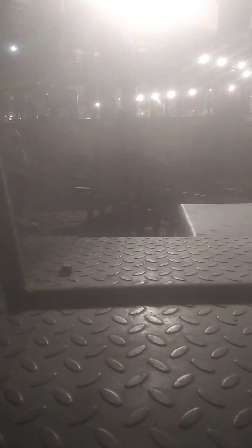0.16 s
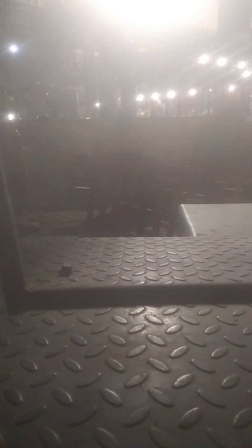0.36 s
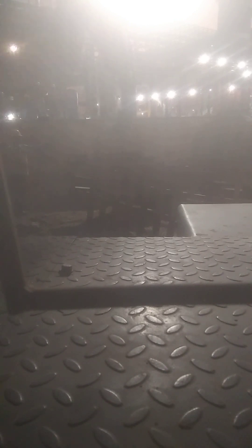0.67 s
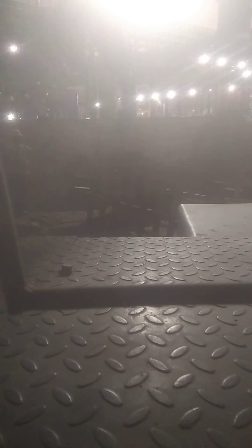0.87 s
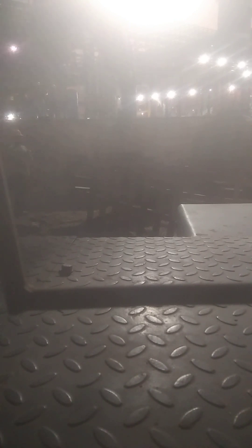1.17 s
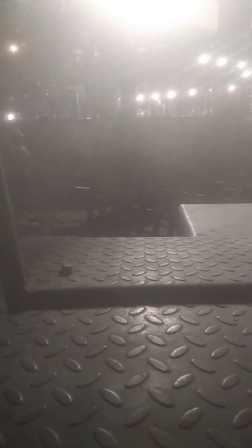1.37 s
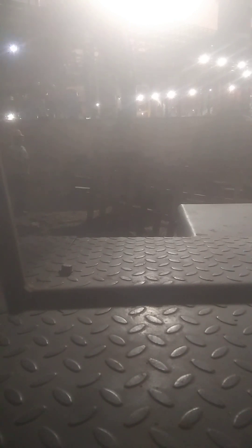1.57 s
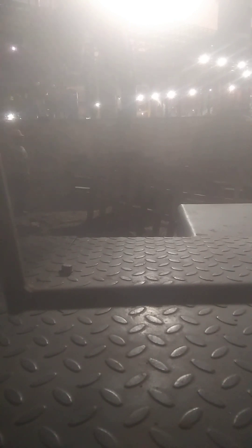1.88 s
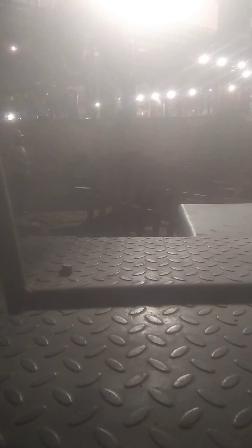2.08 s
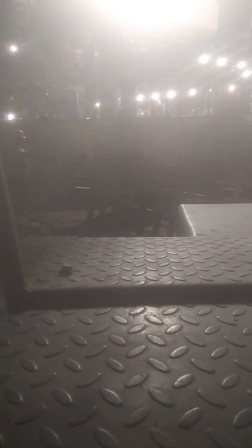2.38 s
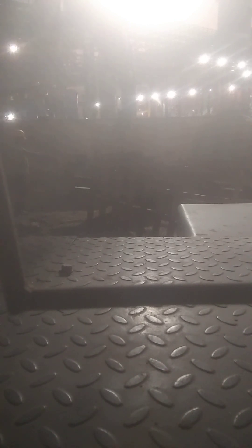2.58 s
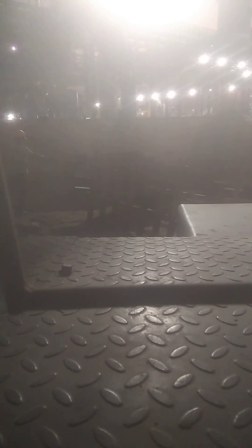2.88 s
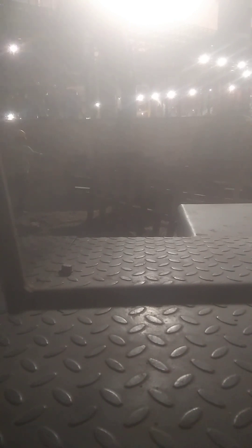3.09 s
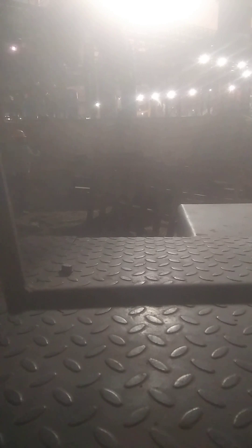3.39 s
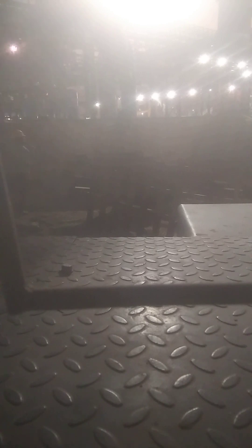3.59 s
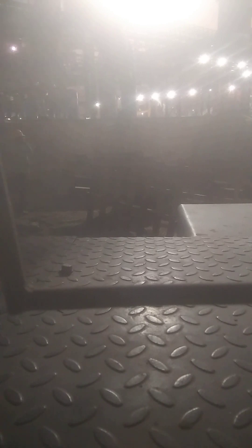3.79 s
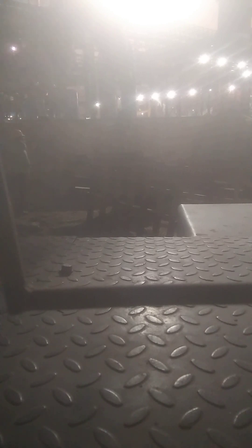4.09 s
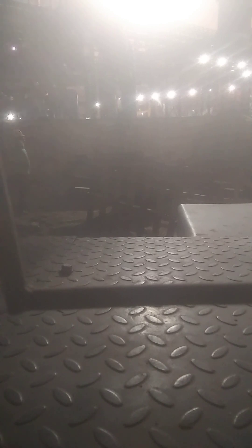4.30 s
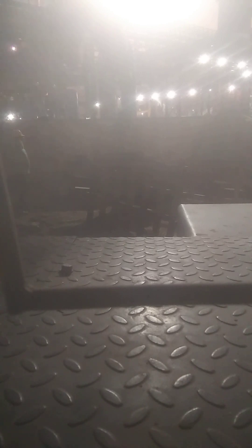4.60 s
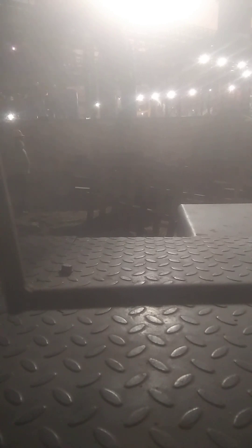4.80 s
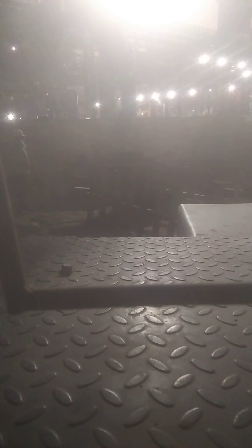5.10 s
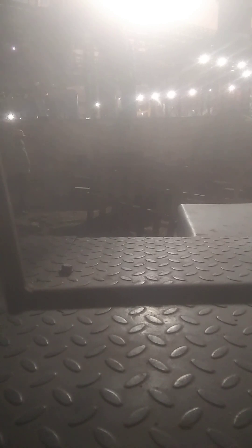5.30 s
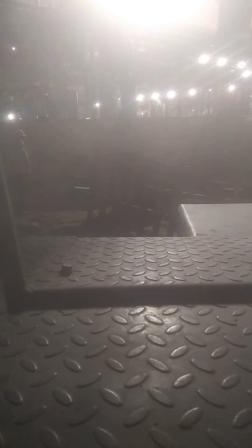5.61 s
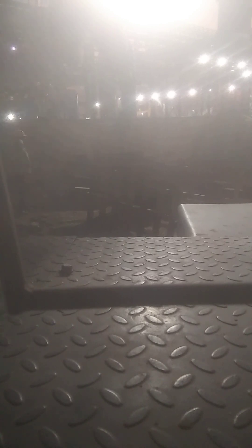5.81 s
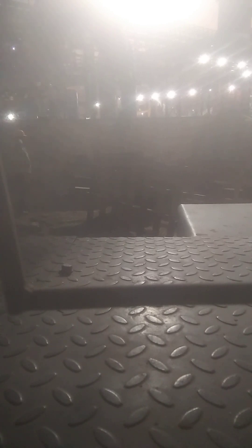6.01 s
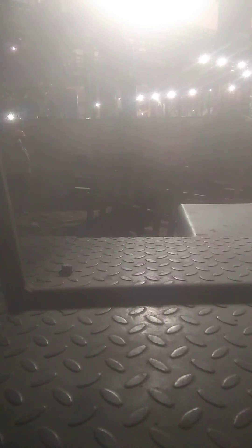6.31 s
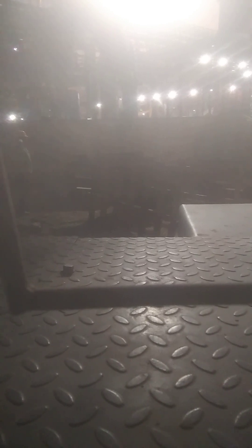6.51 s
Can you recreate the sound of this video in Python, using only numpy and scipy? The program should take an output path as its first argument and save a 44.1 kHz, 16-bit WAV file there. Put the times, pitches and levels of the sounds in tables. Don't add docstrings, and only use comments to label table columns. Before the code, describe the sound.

A diesel crane engine drones steadily, swells into a strained hydraulic whine with hissing oil, then drops back to a hunting, wavering idle.

```python
import sys
import numpy as np
from scipy import signal
from scipy.fft import rfft, irfft, next_fast_len
from scipy.io import wavfile
from scipy.ndimage import uniform_filter1d

SR = 44100
rng = np.random.default_rng(int(sys.argv[2]) if len(sys.argv) > 2 else 0)


def generate_wav(sig):
    pcm = np.round(np.clip(np.atleast_2d(sig).T, -1, 1) * 32767).astype(np.int16)
    wavfile.write(sys.argv[1], SR, pcm)


def volts(x):
    e = np.asarray(x, float) / 20
    return 10 ** e


N = 293260
COARSE = 10

# (time [s], speed [four-stroke cycles/s])
ENGINE_SPEED = [(0, 12.36), (.15, 12.42), (.4, 12.27), (2.45, 12.24), (2.75, 12.1), (3.08, 11.68),
                (3.39, 12.2), (3.76, 11.56), (3.94, 12.08), (4.16, 11.66), (4.4, 11.84), (4.62, 11.75),
                (4.88, 11.86), (5.11, 12.4), (5.3, 12.14), (6.65, 12.16)]
# (time [s], load [0-1.3])
PUMP_LOAD = [(0, 0.09), (2.62, 0.18), (2.8, 0.39), (3.12, 0.84), (3.55, 0.94), (3.8, 1.06), (4.2, 1.2),
             (4.84, 1.15), (5.0, 0.34), (5.25, 0.08), (5.7, 0.26), (6.2, 0.3), (6.65, 0.15)]
# (start [s], end [s], first fuel peak [s], period [s], depth [0-1])
GOVERNOR_HUNTS = [
    (0, 2.75, .33, .33, .6),
    (5.0, 7, 5.0, .416, 1),
]
HUNT_SPEED_SWING = (.1, .38)
# (multiple of cycle [-], no-load level [dB], full-load level [dB],
# swing with fuel [0-1], left-right [dB])
FIRING_AND_PUMP_TONES = [(4, -37.5, -28, 0.35, 0), (10, -37, -45, 0.2, -1.8), (20, -36, -20.5, 0.06, 0.5),
                         (30, -34, -27.5, 0.2, 3.5), (40, -48, -43, 0.06, 8)]
# (multiple of cycle [-], idle [dB], loaded [dB], left-right [dB])
WEAKER_TONES = [(2, -51.0, -45.0, -0.0), (3, -48.0, -50.0, -0.0), (5, -54.0, -48.0, -0.0),
                (6, -53.0, -50.0, 0.0), (8, -56.0, -56.0, -0.0), (9, -56.0, -55.0, -0.0),
                (11, -50.0, -43.0, 0.0), (12, -57.0, -49.0, 0.0), (14, -52.0, -51.0, -2.0),
                (16, -54.0, -37.5, 5.0), (18, -44.0, -39.0, -1.0), (19, -60.0, -46.0, 0.0),
                (21, -58.0, -42.0, 2.0), (22, -57.0, -45.0, 1.0), (24, -48.0, -41.0, 1.0),
                (25, -60.0, -47.0, -1.0), (26, -50.0, -57.0, 2.0), (27, -56.0, -47.0, 1.0),
                (28, -59.0, -44.0, 3.0), (29, -55.0, -53.0, 2.0), (32, -64.0, -50.0, 2.0),
                (34, -55.0, -59.0, 2.0), (35, -63.0, -54.0, 3.0), (36, -57.0, -44.5, 2.0),
                (40, -49.0, -55.0, 6.0), (41, -58.0, -63.0, 3.0), (42, -68.0, -56.0, 4.0),
                (46, -63.0, -47.5, 10.0), (50, -62.0, -52.0, 7.0), (53, -66.0, -60.0, 12.0),
                (44, -66, -59, 7), (48, -66, -61, 7), (55, -68, -58, 8), (60, -64, -60, 6),
               (64, -70, -62, 5), (70, -68, -60, 3), (76, -70, -63, 3)]
# (centre [Hz], width [Hz], change [dB])
DECK_STANDING_WAVES = [(242.2, 7.8, -10), (255.2, 11, 5.5), (351.3, 17.4, -6.5), (372, 5.2, 3.5),
                       (379.8, 7.9, -8), (467, 10.4, -11), (499, 9.4, 6), (506, 9.3, -9)]
# (frequency [Hz], density [dB per Hz])
CLATTER_COLOUR = [(500, 3), (700, 0.5), (830, -2.5), (1100, -4.5), (1440, -10), (1770, -8.5), (2200, -11),
                  (2800, -13), (3400, -17.5), (4500, -32)]
# (frequency [Hz], density [dB per Hz])
RUMBLE_IDLE = [(20, -58.0), (30, -60.0), (43, -51.0), (62, -56.0), (88, -69.0), (135, -62.0), (170, -69.0),
               (240, -62.0), (300, -62.0), (380, -65.0), (480, -70.0), (600, -72.0), (800, -74.0)]
# (frequency [Hz], density [dB per Hz])
RUMBLE_LOADED = [(20, -58.0), (30, -58.0), (43, -54.0), (62, -56.0), (88, -69.0), (135, -57.0),
                 (170, -62.0), (240, -55.0), (300, -58.0), (380, -59.0), (480, -65.0), (600, -68.0),
                 (800, -71.0)]
# (time [s], level [dB], low edge [Hz], tilt [dB per octave])
VALVE_OPENING = [
    (2.35, -62, 11000, -2),
    (2.47, -50, 10800, -4),
    (2.7, -48, 9050, -6.5),
    (2.93, -50.5, 5860, -8),
    (3.65, -52, 6000, 1),
    (4.78, -50, 6350, -6),
    (4.86, -45, 5500, -2),
    (5.01, -50.5, 5000, -7),
    (5.2, -61, 4520, 0),
]
# (centre [Hz], width [Hz], level [dB])
VALVE_LIP_WHISTLES = [(6480, 210, -64), (8930, 100, -59), (11000, 300, -78)]
# (frequency [Hz], density [dB per Hz])
JET_COLOUR = [(3200, 1), (4500, 3), (5500, 0), (6500, -2.5), (7600, 3.5), (9200, 3), (10000, -1),
              (11000, -2), (12000, -5), (13000, -8), (14300, -14)]
# (time [s], level [dB], centre [Hz], length [s])
VALVE_SQUEALS = [
    (4.87, -56, 7200, .03),
    (4.99, -45, 6600, 0.019),
    (4.94, -57, 7900, .04),
]
# (centre [Hz], width [Hz], level [dB])
WHISTLE_PEAKS = [(13600, 170, 0), (13790, 190, -2.5), (14000, 210, -2.5), (14170, 160, -6),
                 (13450, 150, -6)]
# (start [s], end [s], level [dB])
WHISTLE_SPELLS = [
    (.36, .58, -53.5),
    (.63, 2.37, -57),
    (4.84, 4.9, -62),
    (5.13, 5.19, -57),
    (5.26, 6.7, -58.5),
]
# (time [s], level [dB], pitch [Hz], length [s])
FRAME_MOANS = [
    (2.69, -46.5, 763, 0.035),
    (5.755, -46, 660, 0.01),
    (5.843, -48, 2250, 0.0087),
    (5.847, -49, 1990, 0.013),
    (5.85, -47.5, 748, .02),
    (5.91, -32, 134.4, 0.083),
    (6.09, -29.5, 137.2, 0.039),
    (6.26, -46, 684, 0.017),
    (6.236, -32, 134.8, 0.067),
]
# (time [s], peak level [dB], pitch [Hz])
DRY_TICK = (6.607, -24, 9200)
# (pitch [Hz], level [dB], left-right [dB])
MOTOR_HUM = (291, -47.5, 1)
# (frequency [Hz], density [dB per Hz])
YARD_AIR = [(2500, -105), (3400, -94.5), (4200, -85.5), (5500, -86.5), (6830, -86), (7870, -83.5),
            (9000, -88), (10000, -93), (11000, -100), (13000, -100), (14300, -99)]
# (frequency [Hz], likeness [0-1])
PORT_LIKENESS = [(45, 1), (80, 0.94), (130, 1), (250, 0.99), (430, 0.91), (540, 0.84), (750, 0.4),
                 (1100, 0.54), (1450, 0.31), (1750, 0.19), (2200, 0.055), (14000, 0.044)]
# (frequency [Hz], left-right [dB])
PORT_BALANCE = [(70, 1), (125, -1.2), (250, 9), (400, -5), (600, 13), (800, 2.5), (1050, -1), (2000, -3.5),
                (3400, -2.5), (4100, -9.5), (5600, -17.5), (8000, -14), (10500, -6), (13000, -13)]
# (frequency [Hz], phase [radians])
LEFT_PORT_LAG = [(60, 0), (520, 0), (860, 3.1), (1120, 3.1), (1720, 6.2), (2840, 8), (5600, 17),
                 (14000, 40)]


def in_time(rows, step=1):
    s, *columns = np.transpose(rows)
    t = np.arange(0, N, step) / SR
    return [np.interp(t, s, column) for column in columns]


def at_hz(points, hz):
    point_hz, value = np.transpose(points)
    return np.interp(np.log(hz), np.log(point_hz), value)


def drift(rate_hz, step=1):
    knots = rng.standard_normal(int(N / SR * 60) + 2)
    t = np.arange(0, N, step) / SR
    return 1.22 * np.interp(t * rate_hz, np.arange(len(knots)), knots)


def pan(x, left_db):
    sides = volts(np.array([.5, -.5]) * left_db)
    return x * (sides / np.sqrt(np.mean(sides ** 2)))[:, None]


def diffuse_white():
    size = next_fast_len(N)
    hz = np.maximum(np.arange(size // 2 + 1) * SR / size, 1)
    right, stray = rfft(rng.standard_normal((2, size))) * np.sqrt(SR / 2)
    alike = np.clip(at_hz(PORT_LIKENESS, hz), 0, 1)
    lagged = right * np.exp(-1j * at_hz(LEFT_PORT_LAG, hz))
    left = alike * lagged + np.sqrt(1 - alike ** 2) * stray
    sides = volts(at_hz(PORT_BALANCE, hz) * np.array([[.5], [-.5]]))
    return hz, np.array([left, right]) * sides / np.sqrt(np.mean(sides ** 2, axis=0)), size


def coloured(white, gain):
    _, spectra, size = white
    return irfft(spectra * gain, size)[:, :N]


def rms_one(x):
    return x / np.sqrt(np.mean(x ** 2) + 1e-20)


def bump(hz, centre_hz, width_hz):
    return 1 / (1 + (2 * (hz - centre_hz) / width_hz) ** 2)


def governor():
    t, fuel, speed = np.arange(N) / SR, 0, in_time(ENGINE_SPEED)[0]
    for (start, end, peak, period, depth), swing in zip(GOVERNOR_HUNTS, HUNT_SPEED_SWING):
        active = np.clip(np.minimum(t - start + .1, end - t) / .15, 0, 1)
        turn = 2 * np.pi * (t - peak) / period
        fuel = fuel + active * depth * np.cos(turn)
        speed = speed + active * swing * (np.sin(turn) + .25 * np.cos(2 * turn))
    flywheel_speed = uniform_filter1d(speed, size=3000)
    return fuel, np.cumsum(flywheel_speed) / SR


def tone(cycles, multiple, level_db, left_db, wobble_rad):
    phase = 2 * np.pi * (multiple * cycles + rng.random()) + wobble_rad * drift(9.0, step=COARSE)
    hz = multiple * np.gradient(cycles) * SR / COARSE
    for centre_hz, width_hz, change_db in DECK_STANDING_WAVES:
        if abs(centre_hz - hz[0]) < 45:
            level_db = level_db + change_db * bump(hz, centre_hz, width_hz)
    sine = np.sqrt(2) * volts(level_db) * np.sin(phase)
    return pan(sine, left_db if multiple >= 10 else 0)


def drone(cycles, load, fuel):
    cycles, load, fuel = cycles[::COARSE], load[::COARSE], fuel[::COARSE]
    out = 0
    wander_db = 1.43 * (1 - 0.92 * load)
    for multiple, idle_db, loaded_db, swing, left_db in FIRING_AND_PUMP_TONES:
        level_db = idle_db + load * (loaded_db - idle_db) + wander_db * drift(9.0, step=COARSE)
        out = out + tone(cycles, multiple, level_db, left_db, 0.087) * (1 + swing * fuel)
    growth = np.clip(1.17 * load - .05, 0, 1.1)
    for multiple, idle_db, loaded_db, left_db in WEAKER_TONES:
        if multiple != 40:
            level_db = idle_db + growth * (loaded_db - idle_db) - .8 + 2.6 * drift(5.0, step=COARSE)
            out = out + tone(cycles, multiple, level_db, left_db, 0.3)
    return signal.resample_poly(out, COARSE, 1, axis=1)[:, :N]


def clatter(cycles, load, fuel):
    white = diffuse_white()
    hz = white[0]
    noise = rms_one(coloured(white, volts(at_hz(CLATTER_COLOUR, hz)) / (1 + (600 / hz) ** 3.0)))
    turn = 2 * np.pi * cycles
    throb_db = 0.84 * np.cos(4 * turn) + 0.21 * np.cos(turn) + 0.64 * np.cos(10 * turn)
    throb_db = throb_db + 0.53 * drift(14.0)
    return noise * volts(-43.5 + 3.2 * load + 1.6 * fuel * abs(fuel) + throb_db)


def rumble(load):
    white = diffuse_white()
    hz = white[0]
    edge = np.clip(hz / 18, 0, 1) ** 2 / (1 + (hz / 800) ** 5.2)
    idle = coloured(white, edge * volts(at_hz(RUMBLE_IDLE, hz) - .8))
    loaded = coloured(white, edge * volts(at_hz(RUMBLE_LOADED, hz) - 1.4))
    return idle + load * (loaded - idle)


def valve():
    hiss_db, edge_hz, tilt_db = in_time(VALVE_OPENING, step=COARSE)
    white, out = diffuse_white(), 0
    hz = white[0]
    jet = volts(at_hz(JET_COLOUR, hz))
    for centre_hz, width_hz, db in VALVE_LIP_WHISTLES:
        jet = jet + volts(db + 64) * bump(hz, centre_hz, width_hz)
    for band_hz in np.geomspace(3000, 14000, 11):
        distance = abs(np.log(hz / band_hz)) / np.log(14 / 3) * 10
        band = coloured(white, jet * np.clip(1 - distance, 0, 1))
        opening = .25 + .75 / (1 + (edge_hz / band_hz) ** 9.0)
        level_db = hiss_db + tilt_db * np.log2(band_hz / 8000) + 1.1 * drift(7.0, step=COARSE)
        gain = uniform_filter1d(opening * volts(level_db), size=20)
        out = out + band * np.repeat(gain, COARSE)[:N]
    return volts(-34.0) * out


def squeals():
    t, white, out = np.arange(N) / SR, diffuse_white(), 0
    for s, db, centre_hz, length in VALVE_SQUEALS:
        swell = np.exp(-.5 * ((t - s) / length) ** 2)
        out = out + volts(db) * swell * rms_one(coloured(white, bump(white[0], centre_hz, 350)))
    return out


def whistle(load):
    size, t = next_fast_len(N), np.arange(N) / SR
    hz = np.arange(size // 2 + 1) * SR / size
    gain = sum(volts(db) * bump(hz, centre_hz, width_hz) for centre_hz, width_hz, db in WHISTLE_PEAKS)
    near, stray = irfft(rfft(rng.standard_normal((2, size))) * gain, size)[:, :N]
    far = volts(-9.5) * (0.69 * np.roll(near, 20) + 0.85 * stray)
    level = volts(-61.5 - 3 * load)
    for start, end, db in WHISTLE_SPELLS:
        fade = np.clip(np.minimum(t - start, end - t) / .05 + 1, 0, 1)
        level = np.maximum(level, volts(db) * fade)
    return rms_one(np.array([far, near])) * level * volts(2.5 + 1.0 * drift(16.0))


def frame():
    t, out = np.arange(N) / SR, 0
    for s, db, hz, length in FRAME_MOANS:
        swell = np.exp(-.5 * ((t - s) / length) ** 2)
        out = out + volts(db) * swell * np.sin(2 * np.pi * hz * t)
    return out


def tick():
    s, peak_db, hz = DRY_TICK
    since = np.maximum(np.arange(N) / SR - s, 0)
    return pan(volts(peak_db) * np.exp(-since / 0.0002) * np.sin(2 * np.pi * hz * since), 13.0)


def motor_hum(load):
    hz, db, left_db = MOTOR_HUM
    t = np.arange(N) / SR
    return pan(np.sqrt(2) * volts(db + 5.6 * load) * np.sin(2 * np.pi * hz * t), left_db)


def yard_air():
    white = diffuse_white()
    return coloured(white, volts(at_hz(YARD_AIR, white[0])) * (white[0] > 2000))


def scene():
    fuel, cycles = governor()
    load = np.clip(in_time(PUMP_LOAD)[0], 0, 1.5)
    engine = drone(cycles, load, fuel) + clatter(cycles, load, fuel) + rumble(np.minimum(load, 1.2))
    hydraulics = valve() + squeals() + whistle(load)
    machine = engine + hydraulics + frame() + motor_hum(load) + yard_air()
    top_cut = signal.ellip(14, .3, 70, 14270, fs=SR, output="sos")
    return signal.sosfilt(top_cut, machine) + tick()


def roll_off(x):
    return signal.sosfilt(signal.butter(12, 15590, fs=SR, output="sos"), x)


def record(dry):
    return roll_off(dry)


dry = scene()
out = record(dry)
generate_wav(out)
```